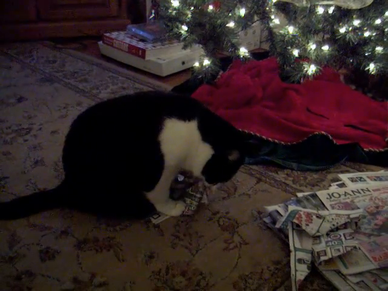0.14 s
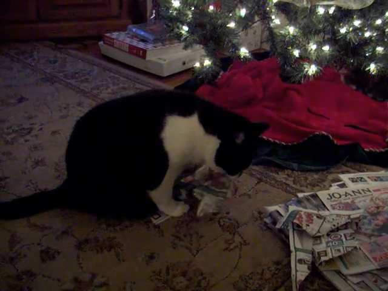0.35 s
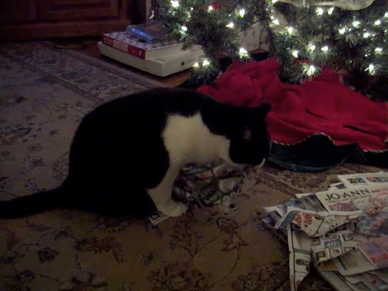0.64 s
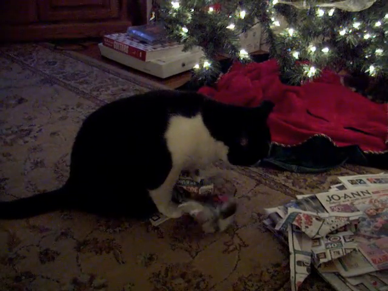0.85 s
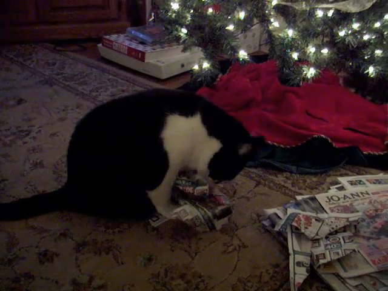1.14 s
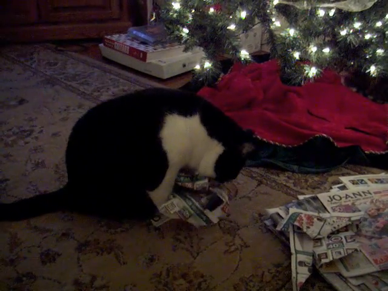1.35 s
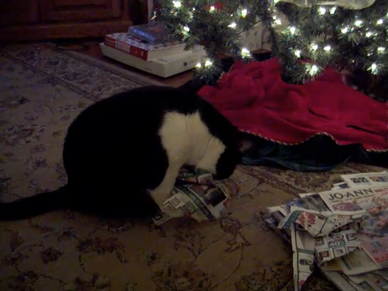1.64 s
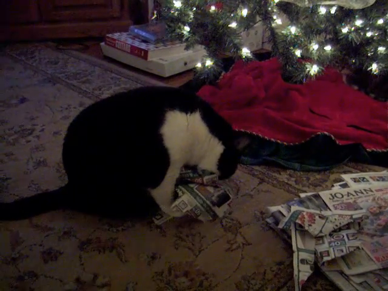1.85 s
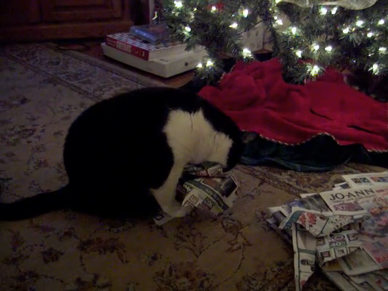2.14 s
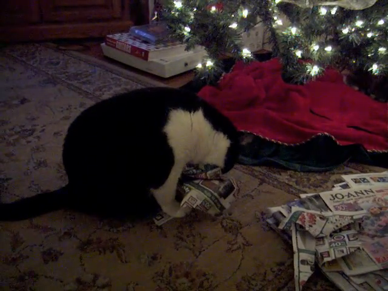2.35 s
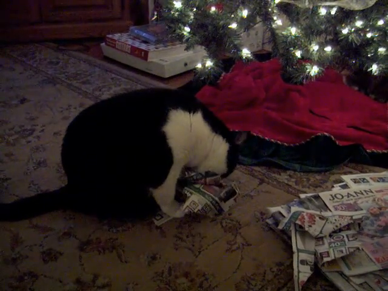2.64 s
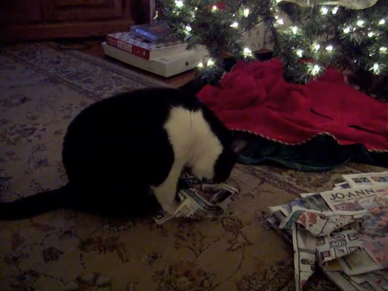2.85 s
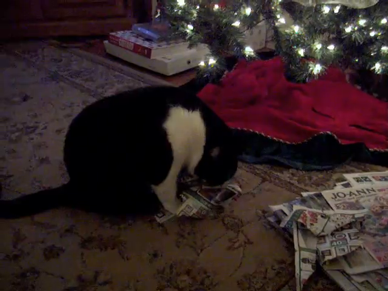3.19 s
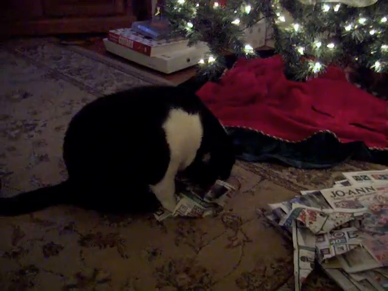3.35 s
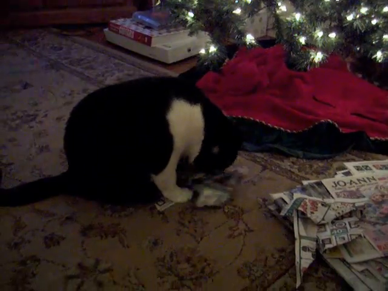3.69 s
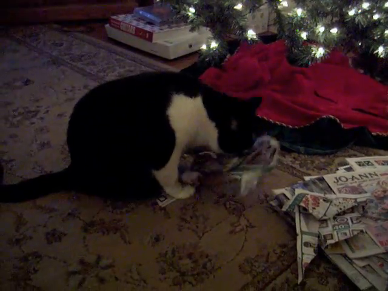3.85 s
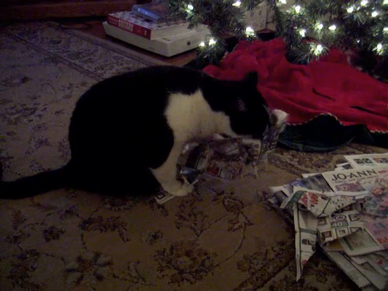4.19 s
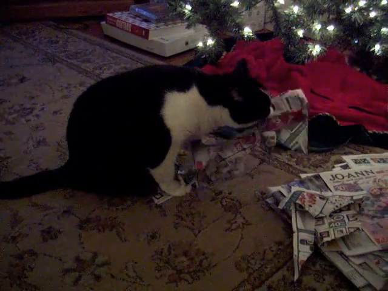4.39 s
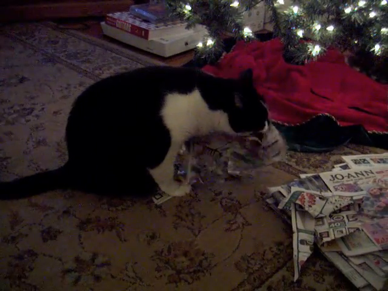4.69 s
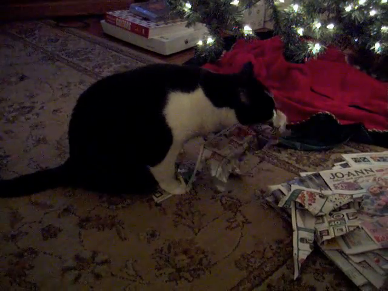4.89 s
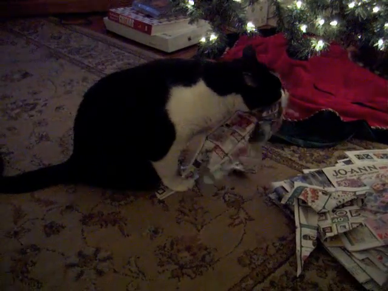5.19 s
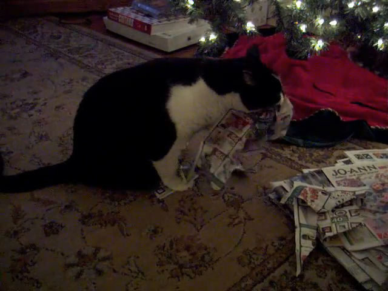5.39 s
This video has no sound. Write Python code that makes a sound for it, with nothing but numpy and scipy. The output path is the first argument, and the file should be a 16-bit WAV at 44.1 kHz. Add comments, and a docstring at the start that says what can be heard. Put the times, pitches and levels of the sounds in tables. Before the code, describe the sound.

Newspaper rustles and rips as a cat bites it, pausing for quiet crinkling and soft paw thumps before tearing again indoors.

```python
"""Quiet chewing and popping paper folds: a cat works a wad of newspaper that it holds down on a rug.
Creases snap and paws thump as it rips at the wad, chews again, then drags it loose and rips again.
Breaking fibres crackle in tiny bursts; a furnished room answers briefly.
A small mono camera adds hiss and a thin whine throughout, and one digital click near the end."""
import sys
import numpy as np
from scipy import signal
from scipy.fft import rfft, irfft, next_fast_len
from scipy.io import wavfile
from scipy.ndimage import uniform_filter1d

SR = 44100
rng = np.random.default_rng(int(sys.argv[2]) if len(sys.argv) > 2 else 0)


def generate_wav(signal):
    """Clip the signal to [-1, 1] and save it as 16-bit WAV at the path in sys.argv[1]."""
    frames = np.transpose(np.atleast_2d(signal))
    scaled = np.clip(frames, -1, 1) * 32767
    pcm = np.round(scaled).astype(np.int16)
    wavfile.write(sys.argv[1], SR, pcm)


N = 243917

CHEW_SPELLS = [(0.0, 0.13, -53, 13), (0.636, 1, -57.5, 33), (1.59, 0.27, -67, 5), (2.536, 0.37, -65.5, 7),
               (2.894, 0.12, -57.5, 73), (3.317, 0.21, -59, 2)]  # t/s, length/s, start level/dB, fade/(dB/s)
FOLD_POPS = [(0.027, -33, 734, -10), (0.058, -40, 545, -4), (0.105, -36.5, 690, -15), (0.22, -32, 536, -8),
             (0.367, -38, 541, -3), (0.73, -39.5, 594, -24), (1.094, -47, 690, -20),
             (1.152, -44.5, 557, -7), (1.29, -44.5, 1130, -9), (2.034, -40, 530, -10),
             (2.405, -49, 494, -8), (2.756, -44, 536, -10), (2.814, -35, 530, -11), (2.896, -28.5, 687, -7),
             (2.972, -36, 765, -9.5), (2.991, -41, 1030, -12), (3.267, -38.5, 1040, -11.5),
             (3.471, -39, 800, -22), (3.51, -39, 603, -14), (3.579, -29.5, 1110, -32),
             (3.731, -34, 540, -21), (5.332, -41.5, 510, -10)]  # t/s, peak/dB, f/Hz, relative crack/dB
CREASE_SNAPS = [(0.1744, 1.5, -3.5, -2.5), (0.2499, -13, -1, 8), (0.3777, -7, -3, -6.5),
                (0.4678, -6, 1.5, -14), (0.599, -1.5, -14, -1), (0.6862, -23.5, 1, 6), (0.7906, -23, 4, -5),
                (0.9165, -25.5, 4, 6.5), (1.1358, -24.5, 2.5, 4), (1.223, -25.5, 6, -3),
                (1.6038, -14.5, -1, -3.5), (1.628, -29, 9, 2), (1.7495, -21, 4.5, -3), (2.4052, -21, 5, -3),
                (2.6184, -25.5, 4.5, -6), (2.719, -23.5, 8, -4), (3.3811, -17, 6, -1),
                (3.7259, -11.5, -4, -6), (3.7367, -15.5, 3.5, -1), (3.7782, -6, -5.5, -2),
                (3.8485, -20.5, 9, 7), (3.8807, -8.5, -1, -1), (4.0662, -19, -5, -4), (4.161, -14, -1, -2),
                (4.1778, -10.5, -17, -8), (4.5909, -18.5, 2.5, -5), (4.6174, -20, -3.5, 2),
                (4.661, -19, -14, -2), (4.7266, -13.5, 4, -1.5), (4.883, -11.5, 2.5, 1),
                (4.962, -10.5, 3, 6), (5.2225, -19, 6, 6)]  # t/s, ring level/dB, relative body/dB, relative edge/dB
PAW_THUMPS = [(0.177, -38, 250), (2.035, -41, 246), (2.406, -45.5, 215), (2.984, -46, 226),
              (3.673, -49, 206), (4.245, -39.5, 184), (4.29, -40.5, 164)]  # t/s, level/dB, f/Hz
# tugs: full-strength t/s, attack/s, hold/s, release/s, crackle/dB, relative flap/dB, relative fizz/dB
PAPER_PULLS = [(0.199, 0.031, 0.018, 0.021, -43.5, 1.5, 4), (0.249, 0.013, 0.0043, 0.058, -41.5, 4, 2),
               (0.317, 0.073, .012, 0.084, -43, -5.5, -14), (0.466, .08, .012, 0.099, -40, -4, -9.5),
               (0.565, 0.034, 0.034, 0.039, -33.5, -8, -8), (3.859, 0.019, 0.028, 0.067, -46, 0.5, -2.5),
               (3.906, 0.032, 0.034, 0.056, -35, -4, -5), (4.078, 0.065, .005, 0.076, -53.5, -6, -9),
               (4.184, 0.031, 0.022, 0.043, -45.5, -5, -7.5), (4.248, 0.073, 0.0076, .08, -47, 0, -4),
               (4.283, 0.031, 0.023, 0.096, -43.5, -3, -9), (4.792, 0.046, 0.0046, 0.077, -43.5, -6, -10),
               (5.102, 0.047, .013, .075, -39.5, -7, -5.5), (5.441, 0.042, 0.013, 0.052, -41.5, -11.5, -6),
               (5.526, 0.021, .02, .05, -41, -6.5, -4)]
# sheet hanging from the mouth: t/s, length/s, crackle/dB, relative flap/dB
HANGING_SPELLS = [(0.19, 0.28, -53, 2.5), (4.561, 0.5, -55.5, -2.5), (5.141, 0.1, -56, -0.5),
                  (5.278, 0.21, -57, -3)]
LOOSE_SHARE = [(0.17, 0.09), (0.45, 0.06), (0.57, 0.55), (3.9, 0.94), (5.5, 0.82)]  # loose edge's part in the crackle: t/s, share/(0-1)
DIGITAL_CLICK = [(5.299, -19.5)]  # t/s, level/dB
WHINE_TONES = [(7300, -72), (8080, -63.5)]  # f/Hz, rms level/dB
ROOM_T60 = [(150, 0.34), (800, 0.26), (3000, 0.12), (10000, 0.17)]  # f/Hz, decay time/s

# spectral shapes: f/Hz, level/dB
CHEW_SPECTRUM = [(76, -24), (130, -1.5), (249, -5), (342, -1), (801, -3.5), (1700, -15.5), (3140, -9.5),
                 (3900, -25), (4770, -12.5), (7000, -13.5), (9100, -56), (15400, -120)]  # wad in the mouth
MURMUR_SPECTRUM = [(12, -34), (20, -2), (36, 2), (55, -6.5), (91, -3.5), (153, -10.5), (232, -7),
                   (335, -12.5), (418, -12), (472, -17), (575, -10), (634, -15), (7000, -22.5), (9100, -74),
                   (15400, -120)]  # room background
AMPLIFIER_SPECTRUM = [(6000, -34), (7200, 1), (9000, -1), (9600, 1.5), (10000, 3), (10500, -4.5),
                      (11200, 5)]  # amplifier hiss
FLAP_SPECTRUM = [(65, -14), (110, -6.5), (278, -0.5), (407, -3.5), (544, 1.5), (603, -1.5), (1130, -1.5),
                 (1750, -12.5), (2280, -10.5), (3850, -120)]  # whole sheet swinging
TIGHT_SPECTRUM = [(1030, -44), (1750, -37), (2220, -17), (3070, -2.5), (3270, -5), (3920, -21), (4560, -9),
                  (5710, -18), (6930, -11), (7800, -18.5), (10100, -26), (17200, -120)]  # tight wad
LOOSE_SPECTRUM = [(1000, -26), (1700, -13), (2020, -1), (2670, -0.5), (3240, -1), (3720, -11), (4960, -1.5),
                  (5320, -8.5), (5710, -12), (6780, -5.5), (7560, -7.5), (7800, -16), (10100, -68),
                  (17200, -120)]  # torn, loose edge
FIZZ_SPECTRUM = [(7400, -41), (8100, -4.5), (9400, 0), (9900, -10.5), (10500, -7), (11200, -10.5)]  # single fibres
SLIP_SPECTRUM = [(88, -49), (150, -24), (215, -4), (293, -10), (506, -1), (818, -1.5), (1210, -0.5),
                 (1390, -8), (1740, -5.5), (2860, -14.5), (3820, -26), (7850, -26), (9000, -31),
                 (11700, -49), (19800, -120)]  # taut sheet slipping

# resonances: f/Hz, width/Hz, level/dB
CREASE_MODES = [(2980, 1110, 2.5), (4330, 2750, -4.5), (6720, 700, -7.5), (8800, 1050, -7)]  # crease flipping over
WAD_MODES = [(215, 124, -1), (870, 630, -9.5)]  # wad pressed on the floor
PANEL_MODES = [(710, 960, 1)]  # flat paper beside a crease


def amp(db):
    """Decibels to gain."""
    return 10 ** (np.asarray(db) / 20)


def unit(x):
    """Scale to rms 1."""
    return x / np.sqrt(np.mean(x ** 2) + 1e-20)


def along(points, hz):
    """Interpolate (f/Hz, value) points on a log axis."""
    f, v = np.transpose(points)
    return np.interp(np.log(hz + 1), np.log(f + 1), v)


def filtered(x, response):
    """Apply a complex frequency response."""
    size = next_fast_len(N + SR // 2)
    return irfft(rfft(x, size) * response(np.fft.rfftfreq(size, 1 / SR)), size)[..., :N]


def coloured(x, spectrum):
    """Shape by a spectrum, at rms 1."""
    return unit(filtered(x, lambda hz: amp(along(spectrum, hz))))


def ring(x, modes):
    """Bank of steep-sided resonances."""
    return filtered(x, lambda hz: sum(
        amp(db) * (1j * hz * width_hz / (mode_hz ** 2 - hz ** 2 + 1j * hz * width_hz)) ** 2
        for mode_hz, width_hz, db in modes))


def add(track, at_s, sound):
    """Mix a sound into the track."""
    part = track[max(round(at_s * SR), 0):][:len(sound)]
    part += sound[:len(part)]


def spell(start_s, length_s, db, fade_db_per_s, open_s=0.0016, close_s=0.013):
    """Rustle gain: sharp onset, steady dB slope, quick close."""
    t = np.arange(N) / SR - start_s
    gate = np.exp(np.minimum(t, 0) / open_s - np.maximum(t - length_s, 0) / close_s)
    return gate * amp(db - fade_db_per_s * np.clip(t, 0, length_s))


def crackle(rate_hz, spread_db, life_s):
    """Fibres give way at random: brief, unequal bursts at an even overall level."""
    hits = rng.random(N) < rate_hz / SR
    energy = hits * amp(spread_db * np.clip(rng.standard_normal(N), -2.5, 2.5)) ** 2
    energy = signal.lfilter([1], [1, -np.exp(-2 / (life_s * SR))], energy)
    average = np.abs(uniform_filter1d(energy, size=1100)) + 1e-9
    return np.sqrt(energy / average) * rng.standard_normal(N)


def burst(t, life_s, scatter):
    """One clean break, then a short scatter of smaller ones."""
    after = rng.standard_normal(len(t)) * np.sqrt(t) * np.exp(-t / life_s)
    return (t == 0) + scatter * unit(after) / np.sqrt(len(t))


def chewing():
    """The wad crumples in the cat's mouth, fine and dull."""
    gain = sum(spell(*row) for row in CHEW_SPELLS)
    return gain * coloured(crackle(rate_hz=380, spread_db=2.5, life_s=0.0018), CHEW_SPECTRUM)


def noise_floor():
    """Room murmur, amplifier hiss and camera whine; the lower tone flutters."""
    t = np.arange(N) / SR
    murmur = amp(-59.5) * coloured(rng.standard_normal(N), MURMUR_SPECTRUM)
    hiss = amp(-54.5) * coloured(rng.standard_normal(N), AMPLIFIER_SPECTRUM)
    low, high = [np.sqrt(2) * amp(db) * np.sin(2 * np.pi * hz * t) for hz, db in WHINE_TONES]
    flutter = unit(filtered(rng.standard_normal(N), lambda hz: np.exp(-((hz - 21) / 9) ** 2)))
    return murmur + hiss + high + low * (1 + 0.47 * flutter)


def fold_pops(crack_drive_db=26, settling_drive_db=17.5):
    """A fold buckles: air swings out and back, creases crack, the wad settles."""
    swings, cracks, settling = np.zeros((3, N))
    t = np.arange(SR // 15) / SR
    for at_s, db, hz, crack_db in FOLD_POPS:
        phase = 2 * np.pi * hz * t - np.pi
        add(swings, at_s, amp(db) * phase * np.exp((1 - phase ** 2) / 2))
        add(cracks, at_s, amp(db + crack_db + crack_drive_db) * burst(t, life_s=0.00037, scatter=0.4))
        add(settling, at_s, amp(db + settling_drive_db) * burst(t, life_s=0.0051, scatter=3.7))
    return swings + ring(cracks, CREASE_MODES) + ring(settling, WAD_MODES)


def crease_snaps():
    """A crease flips and briefly rings the sheet, each with its own mix of resonances."""
    body, middle, edge = np.zeros((3, N))
    t = np.arange(SR // 50) / SR
    for at_s, db, body_db, edge_db in CREASE_SNAPS:
        flip = amp(db) * burst(t, life_s=0.0019, scatter=0.7)
        add(body, at_s, amp(body_db) * flip)
        add(middle, at_s, flip)
        add(edge, at_s, amp(edge_db) * flip)
    return ring(body, PANEL_MODES) + ring(middle, CREASE_MODES[:1]) + ring(edge, CREASE_MODES[1:])


def paw_thumps(t60_s=0.11):
    """Paws press through the rug; the floor rings low and briefly."""
    out = np.zeros(N)
    t = np.arange(SR // 6) / SR
    for at_s, db, hz in PAW_THUMPS:
        add(out, at_s, amp(db) * np.sin(2 * np.pi * hz * t) * amp(-60 * t / t60_s))
    return out


def pulling(range_db=21):
    """Crackle, flap and fizz gains: pulls swell, hold and let go over the hanging sheet's rustle."""
    t = np.arange(N) / SR
    power = np.zeros((3, N))
    for at_s, attack_s, hold_s, release_s, db, flap_db, fizz_db in PAPER_PULLS:
        slack = np.maximum(at_s - t, 0) / attack_s + np.maximum(t - at_s - hold_s, 0) / release_s
        slack_db = range_db * slack
        relative_db = np.array([-slack_db,
                                flap_db - 0.92 * slack_db,  # the sheet swings on after a pull
                                fizz_db - 1.14 * slack_db])  # single fibres break at its height
        power += amp(db + relative_db) ** 2
    for start_s, length_s, db, flap_db in HANGING_SPELLS:
        rustle = spell(start_s, length_s, db, fade_db_per_s=0.5)
        power[:2] += np.array([rustle, amp(flap_db) * rustle]) ** 2
    return np.sqrt(power)


def flexing(x, depth_db):
    """Resonances come and go as the sheet changes shape."""
    spectra = signal.stft(x, nperseg=256)[2]
    field = uniform_filter1d(rng.standard_normal(spectra.shape), size=3, axis=0)
    field = uniform_filter1d(field, size=6, axis=1)
    gain = amp(depth_db * np.clip(unit(field), -2, 2))
    return signal.istft(spectra * gain, nperseg=256)[1][:N]


def ripping():
    """The same fibre breaks drive flap, crackle and fizz; a harder pull breaks more."""
    crackle_gain, flap_gain, fizz_gain = pulling()
    loose = np.clip(np.interp(np.arange(N) / SR, *np.transpose(LOOSE_SHARE)), 0, 1)
    rate_hz = 350 * (1 + 1.5 * loose) * (1 + crackle_gain / amp(-41.5))  # fewer breaks in a tight wad
    breaks = flexing(crackle(rate_hz, spread_db=1.0, life_s=0.0015), depth_db=3.0)
    flap = flap_gain * coloured(breaks, FLAP_SPECTRUM)
    wad = (1 - loose) * coloured(breaks, TIGHT_SPECTRUM)
    edge = loose * coloured(breaks, LOOSE_SPECTRUM)
    fizz = fizz_gain * coloured(breaks, FIZZ_SPECTRUM)
    return flap + crackle_gain * (wad + edge) + fizz


def dragging(start_s=3.578, length_s=0.18, split_hz=1400):
    """The taut sheet slips in dense steps; the rasp dulls as tension goes."""
    bright_gain = spell(start_s, length_s, db=-47, fade_db_per_s=25)
    dull_gain = spell(start_s, length_s, db=-56.5, fade_db_per_s=-33)  # grows
    slips = coloured(crackle(rate_hz=2700, spread_db=-0.5, life_s=0.00056), SLIP_SPECTRUM)
    dull = filtered(slips, lambda hz: 1 / (1 + (hz / split_hz) ** 8))
    return bright_gain * unit(slips - dull) + dull_gain * unit(dull)


def digital_click(width_s=0.0005, highpass_hz=45, lowpass_hz=4000):
    """One dry, square-edged digital click."""
    out = np.zeros(N)
    for at_s, db in DIGITAL_CLICK:
        add(out, at_s, amp(db) * np.ones(round(width_s * SR)))
    return filtered(out, lambda hz: 1j * hz / (1j * hz + highpass_hz) / (1 + 1j * hz / lowpass_hz))


def room(x, wet_db):
    """Direct sound plus a short tail that varies from moment to moment."""
    out = x.copy()
    block = SR // 4
    for start in range(0, N, block):
        hz, t, noise = signal.stft(rng.standard_normal(SR // 2), SR, nperseg=256)
        build_up = 1 - np.exp(-(t / 0.0019) ** 2)  # the nearest furniture answers after a few ms
        decay = amp(-60 * t / along(ROOM_T60, hz)[:, None])
        tail = signal.istft(noise * build_up * decay, SR, nperseg=256)[1]
        wet = signal.fftconvolve(x[start:start + block], tail / np.linalg.norm(tail))
        add(out, start / SR, amp(wet_db) * wet)
    return out


def scene():
    """One mono mix, fed to both channels."""
    rustle = room(ripping() + chewing() + dragging(), wet_db=-8)
    clicks = room(crease_snaps(), wet_db=-3) + room(fold_pops(), wet_db=-6)
    mono = rustle + clicks + paw_thumps() + digital_click() + noise_floor()
    return np.array([mono, mono])


def record(dry):
    """The camera keeps nothing above its band limit."""
    limit_hz, taper_hz = 11350, 900
    return filtered(dry, lambda hz: np.clip((limit_hz - hz) / taper_hz, 0, 1) ** 2)


dry = scene()
out = record(dry)
generate_wav(out)
```